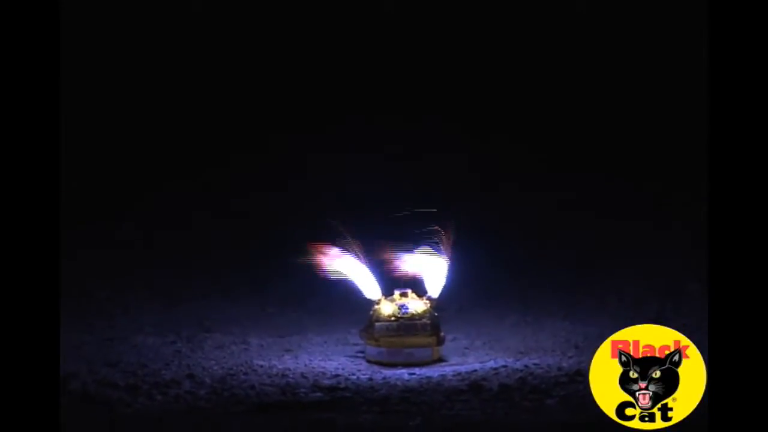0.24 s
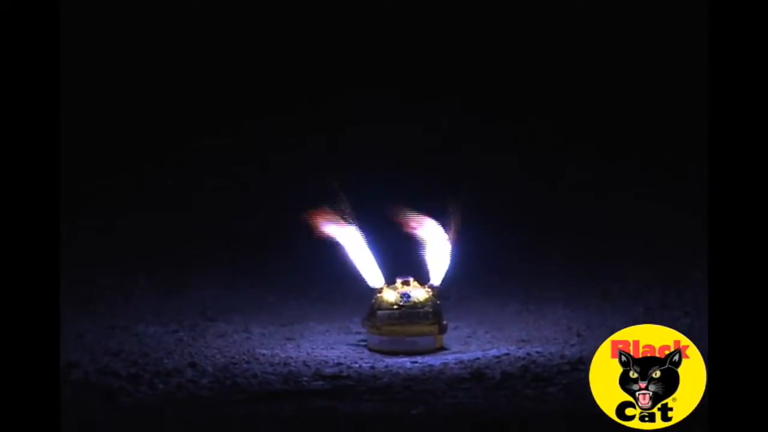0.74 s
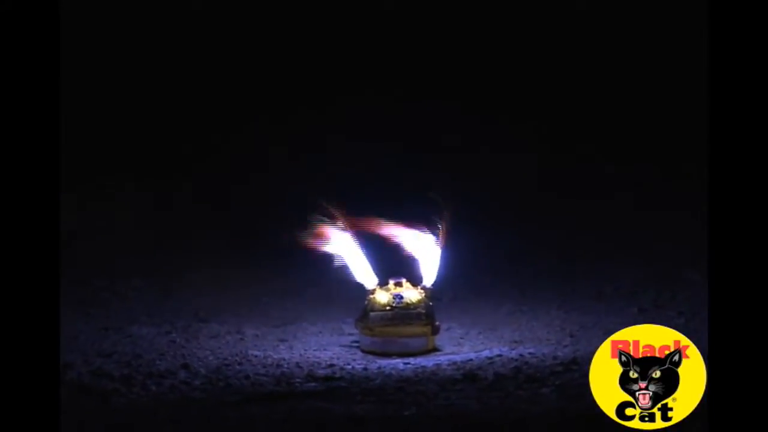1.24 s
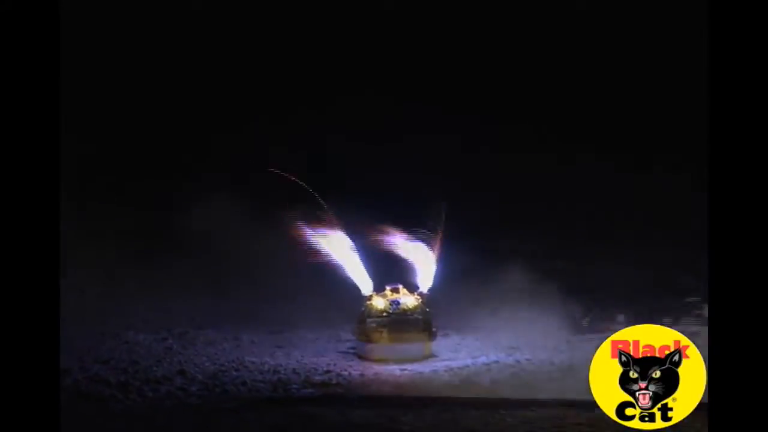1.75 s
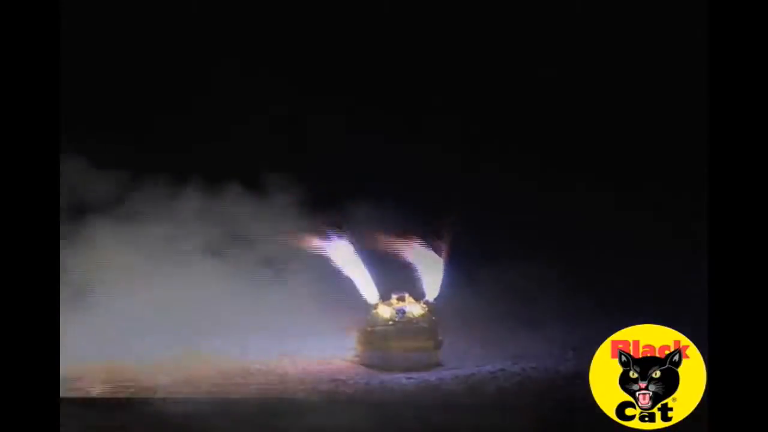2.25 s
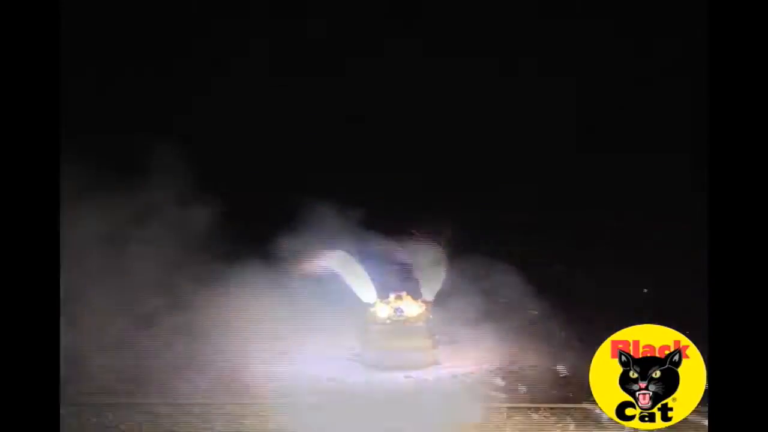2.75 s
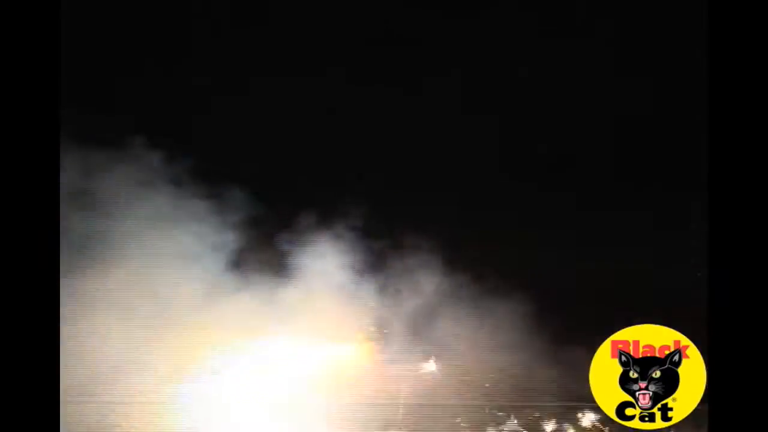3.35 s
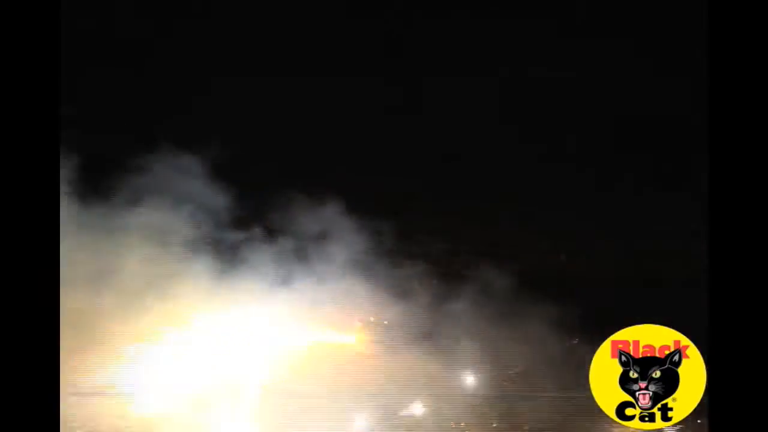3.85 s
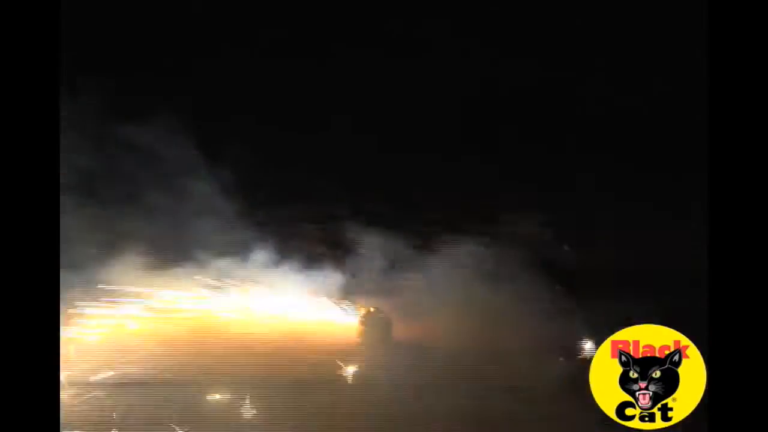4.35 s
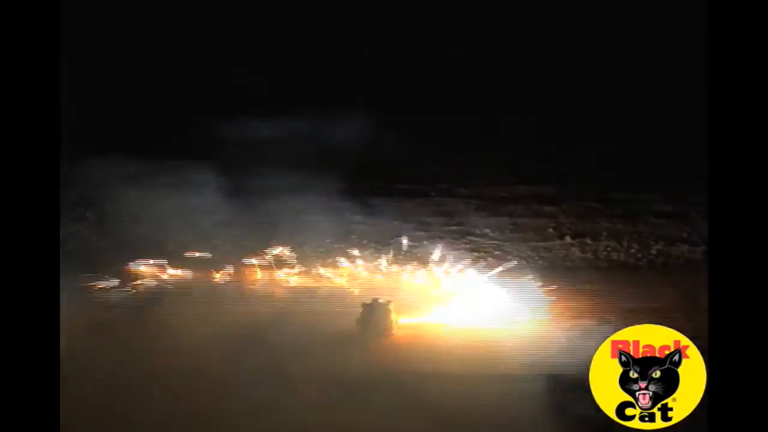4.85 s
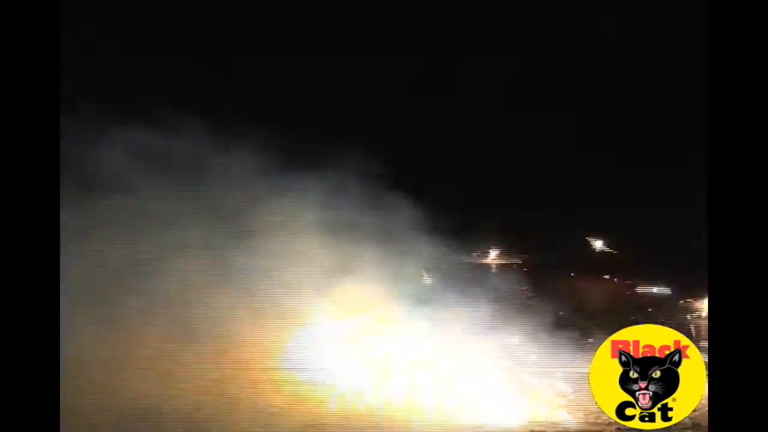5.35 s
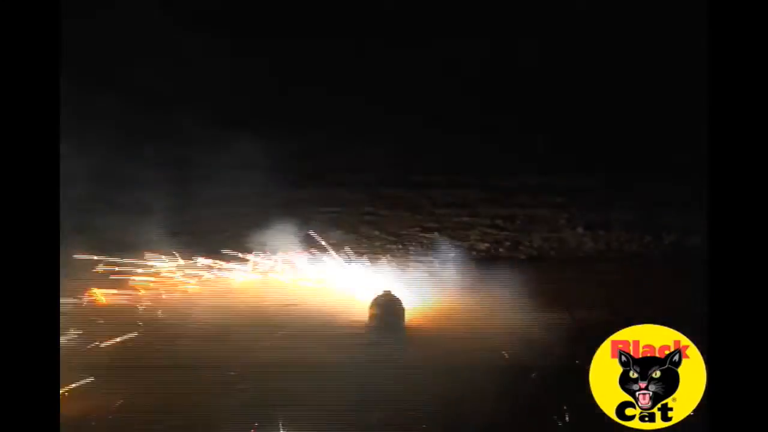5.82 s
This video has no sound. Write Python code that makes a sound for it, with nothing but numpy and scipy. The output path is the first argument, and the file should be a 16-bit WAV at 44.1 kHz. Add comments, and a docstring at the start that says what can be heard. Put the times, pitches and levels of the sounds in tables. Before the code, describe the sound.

A steady, low-roaring firework flame hiss, then a piercing, rough whistle swells up and glides steadily down in pitch, fluttering and crackling in open air.

```python
"""A whistle tube spins on the ground at night, a few metres away in the open: fuel burning in step with an air column.
Its pitch falls as the fuel burns down and the column grows; its level dips as the nozzle swings away.
Gas rushes from it as fluttering noise, hiccups puff low noise, and sparks spit decaying bursts of noise.
Flames hiss throughout as noise shaped by broad resonances, then die away; weak scatter follows the tube.
The recorder's gain control turns everything down under the whistle and stays down."""
import sys
import numpy as np
from scipy import signal
from scipy.fft import rfft, irfft
from scipy.io import wavfile
from scipy.ndimage import uniform_filter1d

SR = 44100
rng = np.random.default_rng(int(sys.argv[2]) if len(sys.argv) > 2 else 0)


def dump(signal):
    """Clip the signal to [-1, 1] and save it as 16-bit WAV at the path in sys.argv[1]."""
    limited = np.clip(np.atleast_2d(signal).T, -1, 1)
    pcm = np.round(limited * 32767).astype(np.int16)
    wavfile.write(sys.argv[1], SR, pcm)


N = 268128
TIME = np.arange(N) / SR  # s
BINS = np.arange(N // 2 + 1) * SR / N  # Hz
TOP_HZ = 15350  # upper edge of the recorder's band
LIGHTS_S = 2.2376  # the whistle tube catches fire

# Hiccups of the burn. Each row: time in seconds, pitch flick in Hz, half length of the flick in seconds,
# level of the low thump in dB.
HICCUPS = [(4.736, 171, 0.004, -33)]
# Flaring (positive) or starving (negative) fuel. Each row: time in seconds, lift in dB, half length in seconds.
FLARES = [(2.555, 4.5, 0.035), (2.68, 7, 0.41), (3.15, 11, .076), (3.435, 1, 0.1), (3.6, 6.5, 0.056),
          (3.95, -9.5, 0.03), (4.745, 3, 0.026), (5.2, -7.5, 0.27), (5.78, 2, 0.23)]


def whistle(jitter=0.0061, jitter_hz=220, flutter_db=1.07, flutter_hz=90, port_skew_rad=0.047,
            overdrive=3.2, unsettled_db=1.0,
            flare_doubling=.33, flare_shrill=0.73, flare_choke=0.15, flare_flutter=0.25):
    """Self-sustained oscillation: the fuel pulses in step with the air column, each cycle a little uneven."""
    # Overtones at 3, 4, 5 .. times the pitch. Each entry: level in dB before shrillness and radiation.
    overtones = [-34.5, -40, -45.5, -51, -50]
    # Tones at 0.5, 1.5, 2.5 .. times the pitch, from alternating strong and weak cycles.
    # Each entry: level in dB relative to the period doubling, before radiation.
    half_tones = [3, -4, -15.5, -16, -17, -15]
    level_db = 7
    octave_start_db, octave_db_per_octave = -26.5, 6.5
    doubling_start_db, doubling_trace_db = -23, -45
    doubling_fades_s, doubling_fade_db_per_s = 3.38, 14

    pitch, away_db, flare_db, burn = tube_pitch(), facing(), bumps(FLARES), thrust()
    uneven_pitch = pitch * (1 + jitter * wander(jitter_hz))
    phase = 2 * np.pi * np.cumsum(uneven_pitch) / SR
    port_skew = port_skew_rad * wander(8) * np.array([[1], [-1]])
    tone = np.sin(phase + port_skew)
    # the octave grows as the pitch falls
    octave_db = octave_start_db + octave_db_per_octave * np.log2(pitch[0] / pitch)
    tone += undb(octave_db) * partial(phase, pitch, away_db, 1.998, fade_db=2.5)
    # the short tube is overdriven: shriller, with every second cycle weaker
    doubling_db = doubling_start_db - doubling_fade_db_per_s * after(doubling_fades_s)
    doubling_db = np.maximum(doubling_db, doubling_trace_db)
    doubling = undb(doubling_db + flare_doubling * flare_db)
    shrill = 1 + overdrive * doubling * undb(flare_shrill * flare_db)
    for multiple, db in enumerate(overtones, 3):
        tone += shrill * undb(db) * partial(phase, pitch, away_db, multiple, fade_db=4.0)
    # cycles alternate most while the tone is below full strength
    unsettled = undb(unsettled_db * (1 - burn))
    for below, db in enumerate(half_tones):
        half_tone = partial(phase, pitch, away_db, below + .5, fade_db=3.5)
        tone += unsettled * doubling * undb(db) * half_tone
    # a flare chokes the tone a little and makes it flutter harder
    shake_db = flutter_db * undb(flare_flutter * flare_db) * wander(flutter_hz)
    tone_db = level_db + away_db - flare_choke * flare_db + shake_db
    return np.sqrt(2) * tone * burn * undb(tone_db)


def tube_pitch():
    """Quarter-wave resonance: the note falls as the air column lengthens above the burning fuel."""
    # Bends from uneven burning. Each row: time in seconds, bend in Hz, half length in seconds.
    bends = [(2.43, -20, 0.11), (2.692, 35.5, 0.072), (2.975, -23.5, 0.053), (3.55, 14.5, .2),
             (3.95, -14, .06), (4.08, 19.5, 0.039), (4.34, -48, 0.062), (4.6, 36.5, 0.14),
             (4.741, 56.5, 0.023), (4.79, -29.5, 0.033), (5.25, 30, 0.035), (5.652, 72, 0.038),
             (5.65, -36.5, .21), (5.95, 81, 0.033)]
    start_m, burn_m_per_s, quicken_m_per_s2 = .0222, .004162, .00041
    sound_m_per_s = 343
    age = after(LIGHTS_S)
    column_m = start_m + burn_m_per_s * age + quicken_m_per_s2 * age ** 2 / 2
    flicks = bumps(row[:3] for row in HICCUPS)
    return sound_m_per_s / (4 * column_m) + bumps(bends) + flicks


def thrust():
    """Growth and decay of a driven oscillation: the burn catches, swells to 1, holds and weakens."""
    catch_s, swell_s, swell_range_db = 0.039, .34, 47.5
    weakens_s, weaken_db_per_s = 5.837, 23
    age = after(LIGHTS_S)
    swell_db = -swell_range_db * np.maximum(1 - age / swell_s, 0)
    return np.minimum(age / catch_s, 1) * undb(swell_db - weaken_db_per_s * after(weakens_s))


def facing():
    """Source directivity: level in dB as the nozzle turns toward us or away, evenly and in odd swings."""
    # Odd swings away as the tube skitters. Each row: time in seconds, depth in dB, half length in seconds.
    swings = [(2.62, 1.5, 0.019), (2.72, 3, 0.075), (3.02, 4, 0.18), (3.34, 4, 0.037), (3.79, 2.9, 0.035),
              (3.98, 7.6, 0.036), (4.27, 4, 0.031), (4.39, 6.5, 0.014), (4.467, 6, 0.015),
              (4.798, 7.5, 0.03), (4.856, 7, 0.011), (5.045, 3, 0.061), (5.155, 10.5, 0.023),
              (5.224, 4.5, 0.03), (5.405, 7, 0.03), (5.501, 5.5, .014), (5.714, 4.5, 0.046),
              (5.828, 8, 0.02), (5.887, 7.1, 0.01)]
    spin_from_s, spin_to_s, turn_s, depth_db = 2.76, 3.83, .143, 1.5
    turns = (np.clip(TIME, spin_from_s, spin_to_s) - spin_from_s) / turn_s
    return -depth_db * np.sin(2 * np.pi * turns) - bumps(swings)


def partial(phase, pitch, away_db, multiple, fade_db, beaming=0.44, spread_rad=0.58, spread_hz=7000,
            mouth_hz=1680, mouth_db_per_octave=60):
    """Radiation from a small mouth: weak low tones, extra dips with turning, port phase that spreads with pitch."""
    # Ringing of the microphone ports. Each row: centre in Hz, half width in Hz, lift in dB.
    port_peaks = [(5006, 280, 8.5), (13200, 410, 4.5)]
    hz = multiple * pitch
    lift_db = sum(db * np.exp(-((hz - centre) / width) ** 2) for centre, width, db in port_peaks)
    lift_db -= mouth_db_per_octave * np.maximum(np.log2(mouth_hz / hz), 0)
    # tones well above the recorder's band are left out
    size = undb(lift_db + beaming * away_db + fade_db * wander(9)) * (hz < TOP_HZ + 500)
    skew = spread_rad * np.minimum(hz / spread_hz, 1) * wander(39) * np.array([[1], [-1]])
    return size * np.sin(multiple * phase + skew)


def rush(level_db=-24, thrust_power=0.83, beaming=0.083, surge_db=2.9, surge_hz=11,
         core_hz=2850, core_width_hz=950, flare_spread=0.48):
    """Turbulent jet noise: gas and sparks stream out in surges; flares mostly lift the tube's ringing band."""
    # Colour of the rush. Each row: frequency in Hz, relative level in dB.
    rush_colour = [(100, -35.5), (400, -24.5), (750, -18), (1000, -13), (1400, -9.5), (2000, -6.5),
                   (2800, 2.5), (3800, -7.5), (5200, -12), (7000, -30), (10000, -29), (15000, -30)]
    flare_db = bumps(FLARES)
    gas = turbulence(spectrum(rush_colour), flicker_db=1.5, flicker_hz=50)
    core = band(gas, core_hz, core_width_hz)
    gas = core * undb(flare_db) + (gas - core) * undb(flare_spread * flare_db)
    gas_db = level_db + beaming * facing() + surge_db * wander(surge_hz)
    return gas * thrust() ** thrust_power * undb(gas_db)


def sparks(count=70, crackle_db=-52, scatter_db=8.5, crackle_s=.002):
    """Impulsive bursts: a few loud sparks and many small ones, each noise with an exponential decay."""
    # Loud sparks. Each row: start in seconds, level in dB, decay time in seconds.
    loud = [(2.085, -50, .007), (2.402, -43, .005), (4.337, -27.5, 0.00297), (4.988, -19, .003),
            (5.775, -24, .004)]
    # Colour of a spark. Each row: frequency in Hz, relative level in dB.
    spark_colour = [(1000, -20), (5000, -22), (8000, -12), (11000, 4), (13000, 6.5), (15500, -8.5)]
    # small sparks lie near crackle_db or above, a few of them far above
    chance = rng.random((count, 2))
    small = [(2.5 + 3.3 * a, crackle_db - scatter_db * np.log(b + .02), crackle_s) for a, b in chance]
    envelope = np.zeros(N)
    age = TIME[:SR // 10]
    for s, db, decay_s in loud + small:
        start = int(s * SR)
        envelope[start:start + len(age)] += undb(db) * np.exp(-age / decay_s)
    return envelope * turbulence(spectrum(spark_colour), flicker_db=4, flicker_hz=500)


def thumps(length_s=0.0092, top_hz=260):
    """Volume pulses: each hiccup pushes out a soft puff of gas, heard as low-passed noise."""
    puff = wander(top_hz)
    return puff * sum(undb(db) * bell(s, length_s) for s, _, _, db in HICCUPS)


def flames(level_db=-39, fades_s=3.14, fade_db_per_s=12,
           hollow_hz=3330, hollow_width_hz=560, hollow_depth=0.75, fill_s=0.72,
           notch_hz=4680, notch_width_hz=100, roar_hz=700, gust_db=0.5):
    """Combustion noise: turbulent flame, filtered by broad resonances and a narrow notch."""
    # Resonant humps. Each row: centre in Hz, width in Hz, relative level in dB.
    humps = [(88, 70, -4), (178, 138, 0.3), (546, 204, 0.06), (977, 300, -8.5), (1234, 180, -5),
             (1640, 120, -6), (2260, 2200, -12.5), (2810, 390, -39.5), (3927, 590, -11), (4985, 500, -14),
             (5860, 460, -30), (10500, 3200, -35), (13000, 1400, -30), (15071, 783, -28.5)]
    # Lean of the flames to the left. Each row: frequency in Hz, left minus right level in dB.
    pan = [(60, -5.5), (200, -2), (380, 0.5), (650, 8.5), (1300, 1), (2400, 1), (15000, 0.5)]
    # The flames stand taller and the roar swells. Each row: time in seconds, lift in dB, half length in seconds.
    roar_swells = [(.72, 1, 0.38), (1.85, 2, 0.3)]

    power = sum(undb(db) ** 2 / (1 + (2 * (BINS - hz) / width) ** 2) ** 2 for hz, width, db in humps)
    notch = 1 - np.exp(-((BINS - notch_hz) / notch_width_hz) ** 2)
    lean = np.sqrt(spectrum(pan))
    gain = np.sqrt(power) * notch * np.array([lean, 1 / lean])
    jets = turbulence(gain, flicker_db=1.15, flicker_hz=60)
    # the low roar gusts as the flames flap
    roar = shape(jets, 1 / (1 + (BINS / roar_hz) ** 4))
    jets = jets + roar * (undb(bumps(roar_swells) + gust_db * wander(8.7)) - 1)
    # the hiss starts hollow and fills in as the flames stand up
    hollow = hollow_depth * bell(0, fill_s) * band(jets, hollow_hz, hollow_width_hz)
    return (jets - hollow) * undb(level_db - fade_db_per_s * after(fades_s))


def surroundings(x, t60_s=0.17, first_s=0.0088):
    """Diffuse scattering: decaying noise as the response of ground and far things; it beats with the glide."""
    age = TIME[:SR // 2]
    scatter = colour(rng.standard_normal((2, N)), spectrum([(3000, 0.5), (15000, -4.5)]))[:, :len(age)]
    scatter = scatter * undb(-60 * age / t60_s) * (age > first_s)
    # unit energy, averaged over the two sides
    scatter /= np.sqrt(np.mean(np.sum(scatter ** 2, axis=1)))
    return signal.fftconvolve(x, scatter, axes=1)[:, :N]


def turbulence(gain, flicker_db, flicker_hz):
    """Partly coherent stereo jet noise: a shared part plus a diffuse part of opposite sign at each port."""
    # Diffuse part, which differs between the ports. Each row: frequency in Hz, level in dB re the shared part.
    diffuse = [(60, -19), (300, -7.5), (650, -6), (1400, -8.5), (3100, -25), (5500, -6.5), (8000, -1),
               (15000, -14)]
    mid, side = (colour(rng.standard_normal(N), 1) for _ in range(2))
    side = shape(side, spectrum(diffuse))
    return colour(np.array([mid + side, mid - side]), gain) * undb(flicker_db * wander(flicker_hz))


def wander(hz):
    """Low-passed random process: noise up to about hz, with spread 1."""
    return colour(rng.standard_normal(N), 1 / (1 + (BINS / hz) ** 2))


def colour(x, gain):
    """Spectral shaping by a gain per frequency, normalised to rms 1."""
    y = shape(x, gain)
    return y / np.sqrt(np.mean(y ** 2))


def shape(x, gain):
    """Linear zero-phase filtering: multiplies the spectrum by a gain per frequency."""
    return irfft(rfft(x) * gain, N)


def band(x, centre_hz, width_hz):
    """Band-pass filtering with a Gaussian response."""
    return shape(x, np.exp(-((BINS - centre_hz) / width_hz) ** 2))


def spectrum(points):
    """Frequency response: gain at every bin, interpolated in dB over log frequency from (Hz, dB) points."""
    hz, db = np.transpose(points)
    return undb(np.interp(np.log(BINS + 1), np.log(hz), db))


def undb(db):
    """Logarithmic level: decibels to amplitude gain."""
    return 10 ** (np.asarray(db) / 20)


def after(s):
    """Elapsed time: seconds since s, zero before."""
    return np.maximum(TIME - s, 0)


def bell(s, length):
    """Gaussian envelope: a smooth bump at s that falls to 1/e after length seconds either way."""
    return np.exp(-((TIME - s) / length) ** 2)


def bumps(events):
    """Superposition of smooth bumps from (s, height, half length s) rows."""
    return sum(height * bell(s, length) for s, height, length in events)


def scene():
    """Superposition: tube sounds, their scatter and the flames add in the open air."""
    tube = whistle() + rush() + sparks() + thumps()
    return tube + flames() + undb(-25.5) * surroundings(tube)


def gain_control(x, threshold_db=-25, squeeze=0.59):
    """Level compression with peak hold: turns down at once above the threshold and stays down."""
    power = uniform_filter1d(np.mean(x ** 2, axis=0), SR // 50)  # 20 ms average
    heard_db = 10 * np.log10(np.abs(power) + 1e-12)
    loudest_db = np.maximum.accumulate(heard_db)
    return x * undb(-squeeze * np.maximum(loudest_db - threshold_db, 0))


def record(dry):
    """Band-limited transduction: gain control, faint self-noise and a steep cut of the top."""
    # Colour of the recorder's own noise. Each row: frequency in Hz, relative level in dB.
    self_noise = [(25, 2), (90, 1.5), (180, -2), (350, -10), (700, -15.5), (1200, -18.5), (4000, -26),
                  (15000, -41)]
    noise = undb(-59.5) * colour(rng.standard_normal((2, N)), spectrum(self_noise))
    top_cut = signal.ellip(10, .2, 80, TOP_HZ, fs=SR, output="sos")
    return signal.sosfilt(top_cut, gain_control(dry) + noise)


dry = scene()
out = record(dry)
dump(out)
```